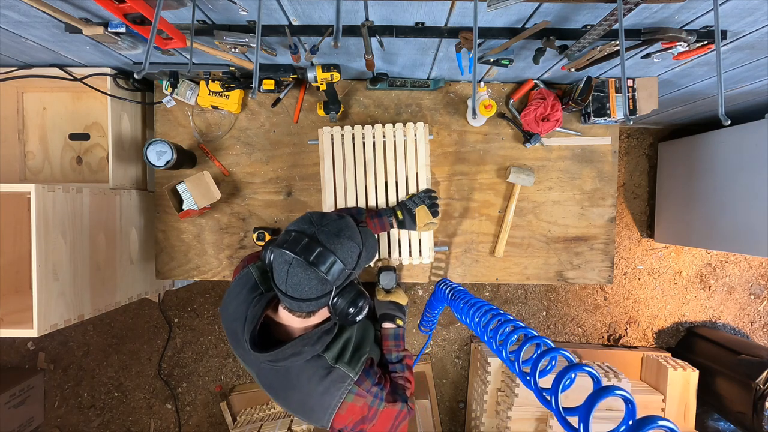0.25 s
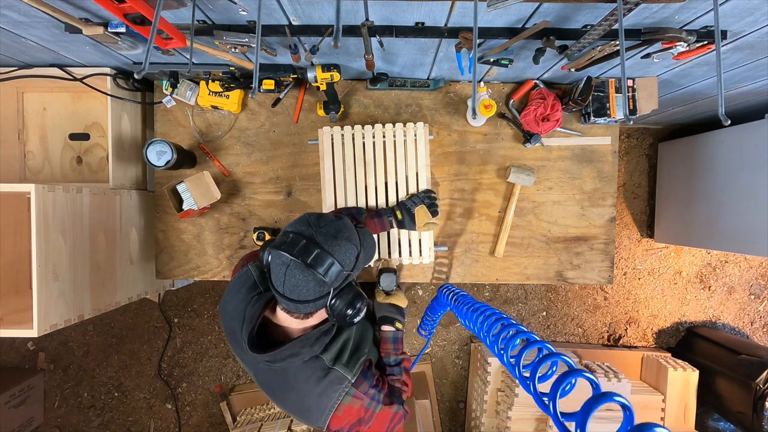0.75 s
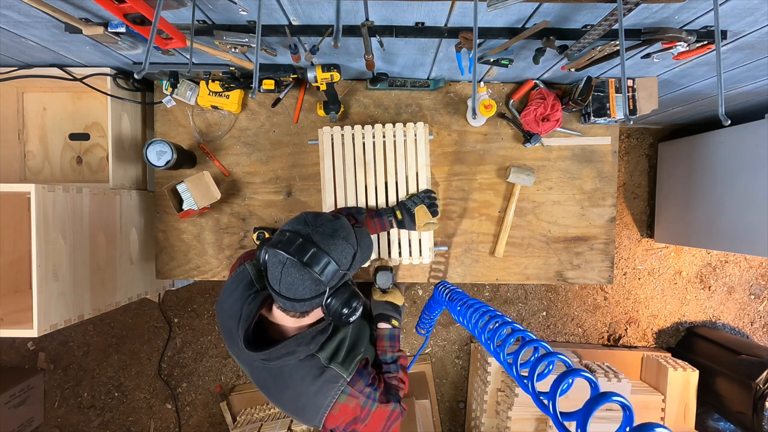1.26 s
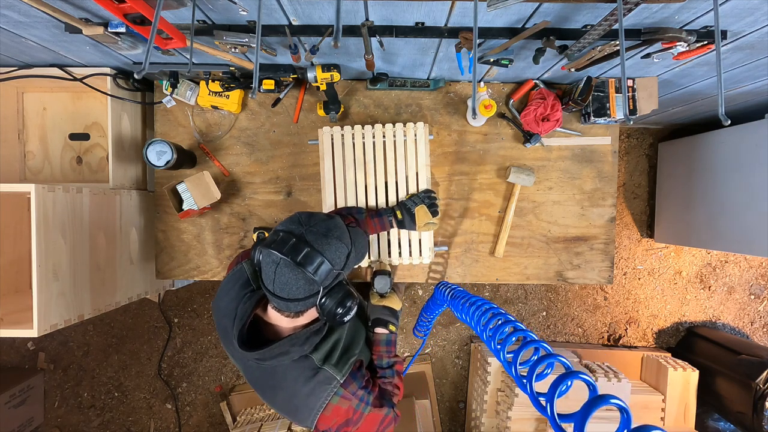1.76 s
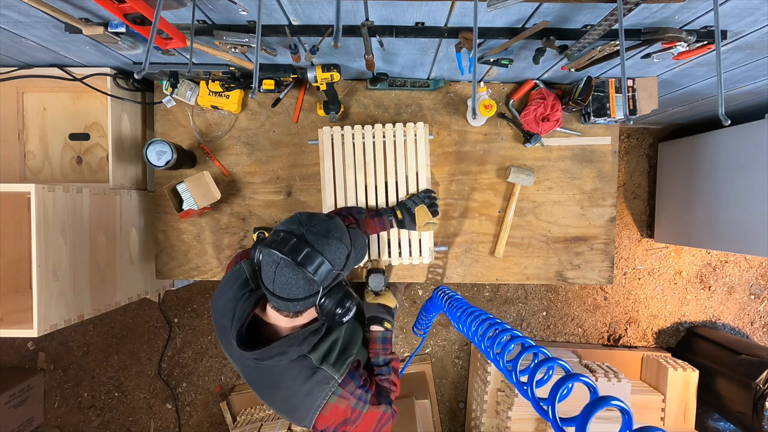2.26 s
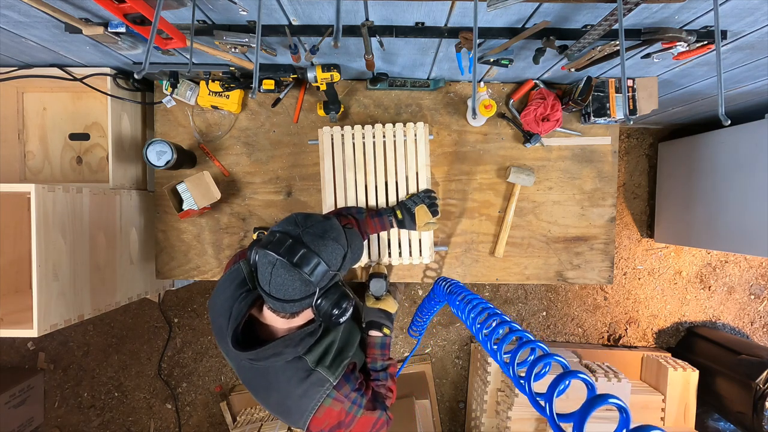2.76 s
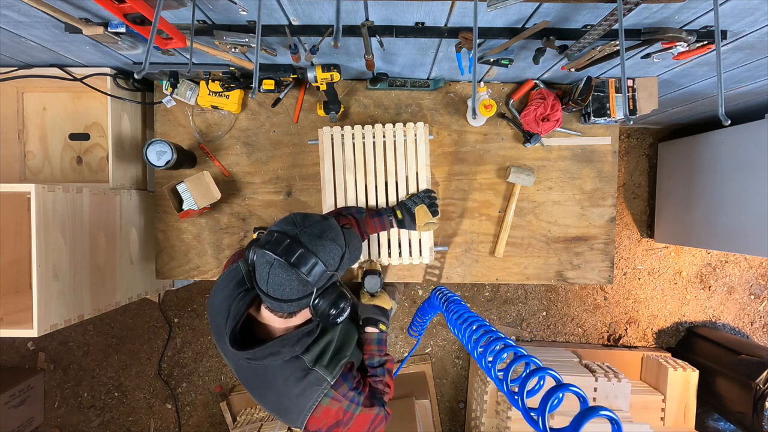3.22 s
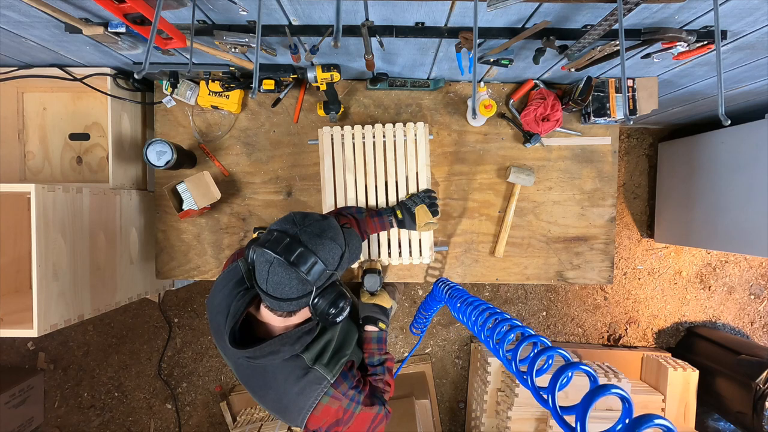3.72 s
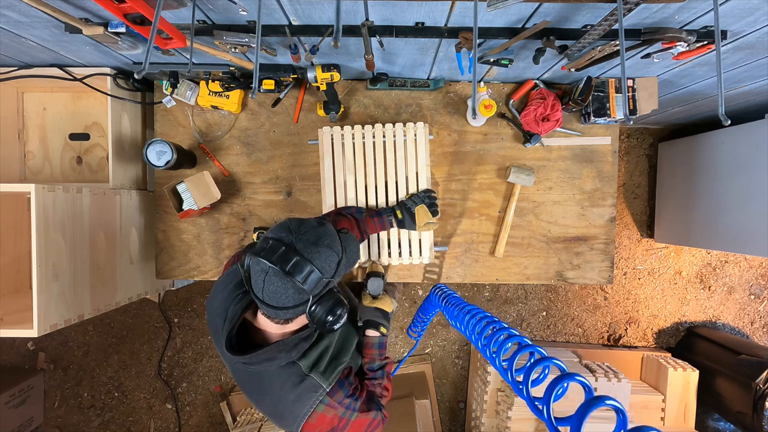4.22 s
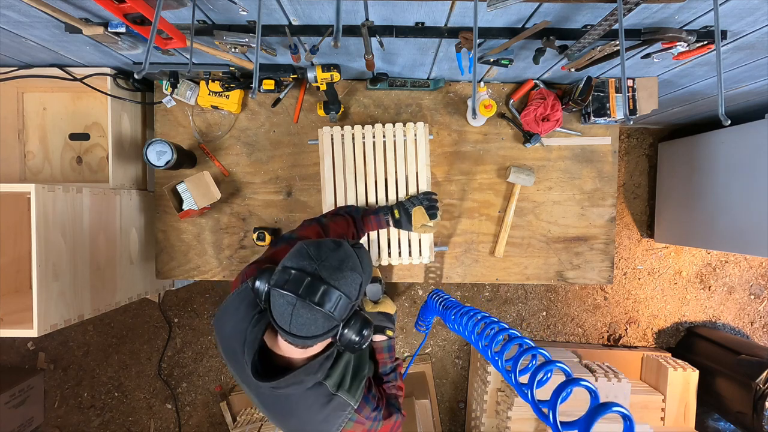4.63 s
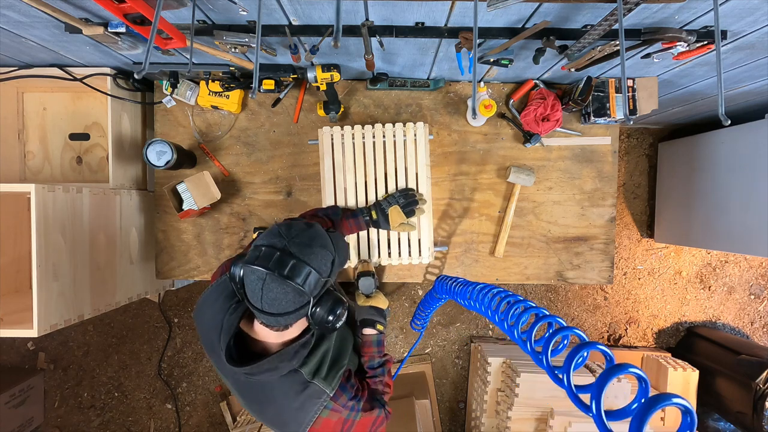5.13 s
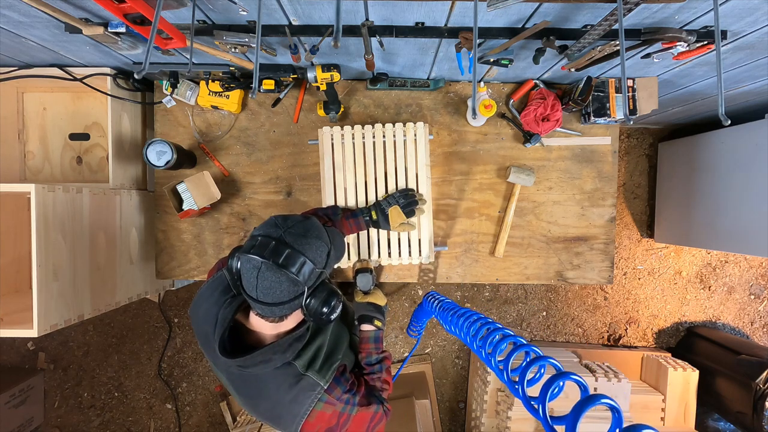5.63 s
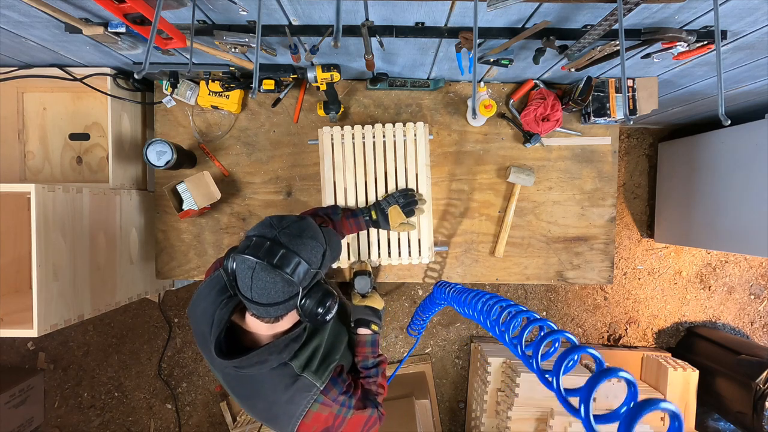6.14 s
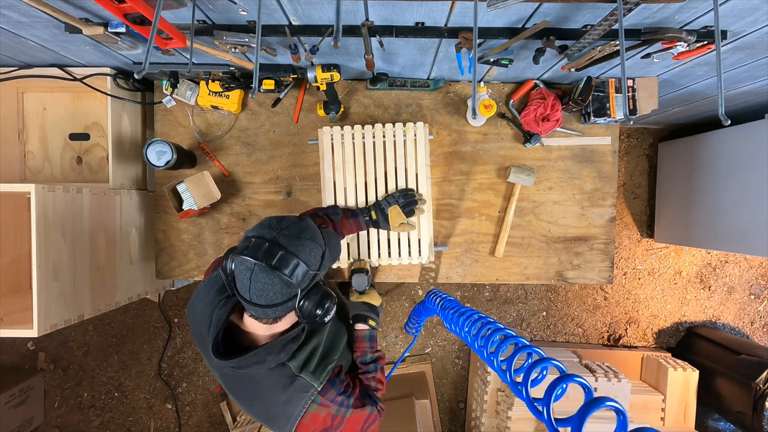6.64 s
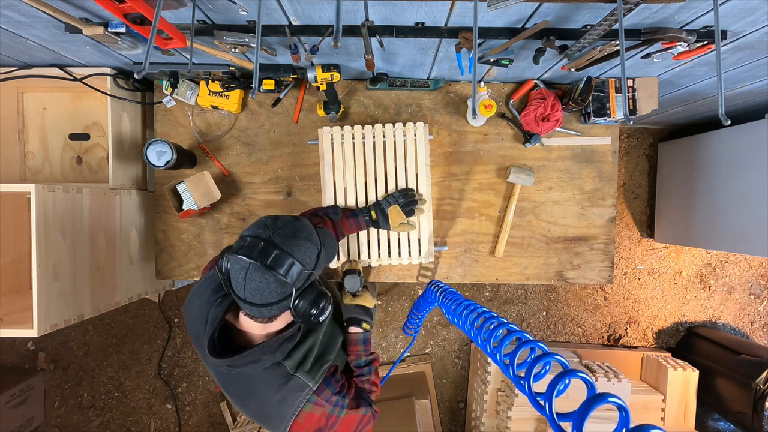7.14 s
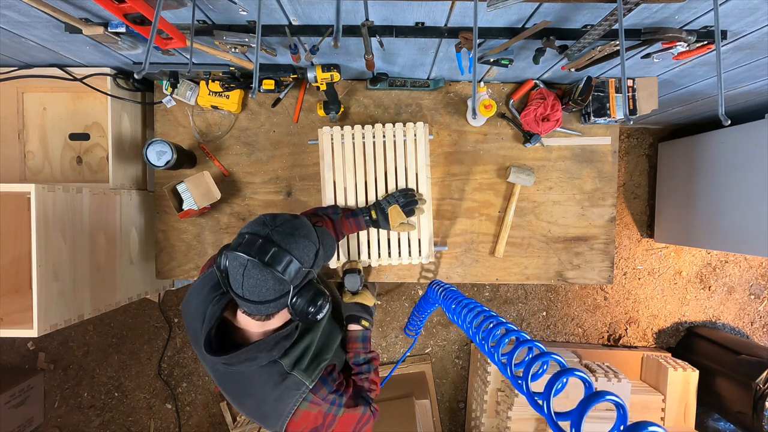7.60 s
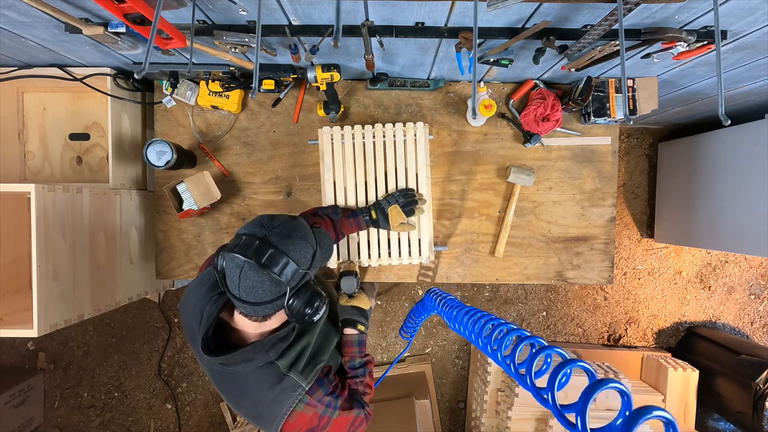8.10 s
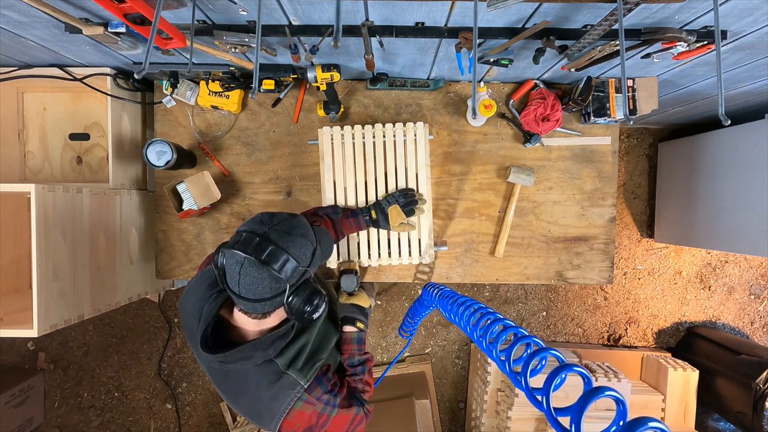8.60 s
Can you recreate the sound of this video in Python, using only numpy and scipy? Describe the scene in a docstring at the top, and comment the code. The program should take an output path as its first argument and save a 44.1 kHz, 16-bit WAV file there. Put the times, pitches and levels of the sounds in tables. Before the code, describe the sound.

In a small cluttered workshop, a pneumatic stapler drives eight separate staples into a slatted wooden frame, roughly one per second with longer gaps mid-way. Each is a hard crack with hollow wood thump, then a piston clack and a puff of air thinning to hiss. Soft wooden knocks, light ticks and cloth rustle fill the gaps, busiest around five seconds. Close microphone, peaks slightly overloaded, short room reflections.

```python
"""Rustling gloves and sleeves bring a pneumatic stapler down on a slatted wooden frame in a small workshop.
A faint woody noise swells just before each shot; the stroke is pressure pulses, cracks, wood modes and airy noise.
On release the piston clacks back, a noise puff thins to a hiss, and a faint steel sine rings on.
Between shots come soft knocks of ringing wood, light ticks and more rustle, most of it near five seconds.
The eighth stroke has only just begun at the end; room reflections and a dull noise floor lie under it all."""
import sys
import numpy as np
from scipy import signal
from scipy.fft import rfft, irfft, next_fast_len
from scipy.io import wavfile

SR = 44100
rng = np.random.default_rng(int(sys.argv[2]) if len(sys.argv) > 2 else 0)


def wav_out(sig):
    """Save sig, one row per channel (or a flat mono array), as 16-bit PCM at SR to the path in sys.argv[1]."""
    wavfile.write(sys.argv[1], SR, np.round(np.clip(np.atleast_2d(sig).T, -1, 1) * 32767).astype(np.int16))


N = 390726

SHOT_SIZE = SR * 3 // 4  # samples in one shot sound
AGE = np.arange(SHOT_SIZE) / SR  # seconds
LEAD_S = .01  # room ahead of the first impact in a shot sound


def from_db(db):
    """Turn decibels into an amplitude factor."""
    return 10 ** (np.asarray(db) / 20)


def fade(age, t60):
    """Silent before age zero, then falling 60 dB in t60 seconds."""
    return (age >= 0) * np.exp(-np.log(1000) * np.maximum(age, 0) / t60)


def swell(age, rise, t60):
    """A rounded rise into a decay, both in seconds."""
    return (1 - np.exp(-np.maximum(age, 0) / rise)) * fade(age, t60)


def noise(spectrum, size=SHOT_SIZE):
    """Noise of rms 1, coloured by a spectrum and rolled off beyond both its ends."""
    hz, db = np.transpose(spectrum)
    length = next_fast_len(size)
    bins = np.maximum(np.fft.rfftfreq(length, 1 / SR), 1)
    skirts = np.minimum(bins / hz[0], 1) ** 2 * np.minimum(hz[-1] / bins, 1) ** 2
    colour = from_db(np.interp(np.log(bins), np.log(hz), db))
    white = rfft(rng.standard_normal(length))
    x = irfft(white * skirts * colour, length)[:size]
    return x / x.std()


def uneven(spread_db, step_s):
    """A gain that glides to a new chance value every step."""
    t = np.arange(N) / SR
    chance = rng.standard_normal(N)
    return from_db(spread_db * np.interp(t / step_s, np.arange(N), chance))


def add(track, s, sound):
    """Mix a sound in at time s."""
    start = min(max(round(s * SR), 0), len(track))
    part = sound[:len(track) - start]
    track[start:start + len(part)] += part


# Shots: (trigger pulled [s], trigger released [s], stroke gain [dB], return gain [dB],
#         extra gain of inrushing air [dB], steel ring level [dB])
SHOTS = [(0.4276, 0.5787, 2, 2.5, 1, -59), (1.4724, 1.6219, 2, 2, 0.5, -58),
         (2.547, 2.6997, 1, 1.5, -1.5, -64), (4.0624, 4.2502, 1, 3, -2, -64.5),
         (5.7954, 5.947, 1.5, 2, 1, -60), (6.6612, 6.8065, 1, 1.5, 1.5, -57.5),
         (7.701, 7.8647, 1.2, 1, 0, -54), (8.844, 9.0, 0.5, 6.5, 2.5, -56)]
# Woody noise colour: (frequency [Hz], relative density [dB])
KNOCK_COLOUR = [(120, -18), (220, -5), (290, 9), (440, 0), (580, -0.5), (690, -13.5), (800, -6),
                (1000, -12), (1400, -21.5), (2000, -30.5), (5000, -50)]
STEEL_T60_S = 2.4


def stapler(swell_db=-31, swell_s=0.079, ring_hz=781):
    """A faint woody noise swells up to each shot, then stroke and return follow; a steel part rings on faintly."""
    out = np.zeros(N)
    ring_age = np.arange(2 * SR) / SR
    until_shot = AGE[:SR // 4][::-1]  # counts down, so the noise's decay runs backwards and grows
    for fire_s, release_s, stroke_db, return_db, air_db, ring_db in SHOTS:
        lead_in = noise(KNOCK_COLOUR, size=len(until_shot)) * swell(until_shot, 0.0016, swell_s)
        add(out, fire_s - until_shot[0], from_db(swell_db) * lead_in)
        add(out, fire_s - LEAD_S, from_db(stroke_db) * stroke(air_db))
        add(out, release_s - LEAD_S, from_db(return_db) * release())
        ring = np.sin(2 * np.pi * ring_hz * ring_age) * fade(ring_age, STEEL_T60_S)
        add(out, release_s, from_db(ring_db) * ring)
    return out


# Impacts of the stroke (valve, driver on staple, staple seating, recoil), before the shot's gain:
# (delay [s], mean push level [dB], push frequency [Hz], crack level [dB])
STROKE = [(.0007, 3.5, 493.4, -14), (.0075, 1.5, 419.4, -10.5), (.0112, -1.5, 1141, -10.5),
          (.0122, -5, 380, -13), (.0152, -6, 260, -14.5), (.0218, -7, 300, -18.5)]
# Colours of the stroke's crack, inrushing air, sizzle and bench thud: (frequency [Hz], relative density [dB])
STROKE_CRACK = [(500, -4), (1000, 9.5), (1800, -1.5), (2400, -8.5), (3500, -13), (5000, -22), (7500, -28.5),
                (11000, -37), (16000, -43)]
AIR_IN = [(40, -24.5), (100, -17.5), (200, -6), (340, 5.5), (600, 0), (800, -10), (950, -17), (1300, -9.5),
          (1800, -20.5), (2400, -30), (4200, -43), (5500, -57.5), (9000, -65), (16000, -73)]
HISS = [(2500, -15), (4200, 1.5), (5100, -8), (5700, -2), (6400, -7.5), (7200, 0.5), (8800, -4),
        (10200, -13), (16000, -19.5)]
THUD = [(25, -11), (70, 2), (140, -2), (250, -19), (800, -53)]


def stroke(air_db, wood_db=0, bounce_db=-10, bounce_s=.066, bounce_gap_s=.017, bounce_loss_db=3,
           rush_db=-24, air_hold_s=.09, air_t60=0.39, sizzle_db=-46, bench_db=-35):
    """The staple is driven home and the frame bounces twice; air rushes into the cylinder, holds, then fades."""
    age = AGE - LEAD_S
    wood = from_db(wood_db) * frame(age - .0105, damping=1.0)
    for k in range(2):
        since = age - bounce_s - k * bounce_gap_s
        bounce = frame(since, damping=1.2) * swell(since, 0.0012, 2)
        wood = wood + from_db(bounce_db - k * bounce_loss_db) * bounce
    rush_shape = np.clip((age + .006) / .025, 0, 1) * fade(np.maximum(age - air_hold_s, 0), air_t60)
    rush = from_db(rush_db + air_db) * noise(AIR_IN) * rush_shape
    sizzle = from_db(sizzle_db) * noise(HISS) * swell(age - .008, 0.0025, 0.052)
    bench = from_db(bench_db) * noise(THUD) * swell(age, 0.0036, 0.12)
    return impacts(STROKE, STROKE_CRACK, 0.022) + wood + rush + sizzle + bench


# Impacts of the returning piston and valve, before the shot's return gain:
# (delay [s], mean push level [dB], push frequency [Hz], crack level [dB])
RETURN = [(.0006, -2, 622, -9), (.0024, -9.5, 1101, -18.5), (.0056, -2.5, 438.3, -20.5),
          (.017, -5, 400, -29), (.0502, -8.5, 850, -24.5), (.052, -6.5, 430, -20.5)]
# Colours of the return's crack and the vented puff: (frequency [Hz], relative density [dB])
RETURN_CRACK = [(500, -7.5), (1000, 1), (1900, 4), (3100, -3), (4400, -30.5), (6000, -24), (9000, -35),
                (16000, -43.5)]
AIR_OUT = [(40, -18), (90, 6.5), (170, -1), (330, -8), (1000, 4), (1500, -5), (2200, -13.5), (2700, -22.5),
           (4200, -23), (5000, -29.5), (9000, -42), (16000, -51.5)]


def release(wood_db=-13, puff_db=-16, puff_t60=0.19, hiss_db=-51, hiss_t60=.42):
    """The piston clacks back; the vented air starts as a puff and thins to a hiss."""
    age = AGE - LEAD_S
    wood = from_db(wood_db) * frame(age - .005, damping=0.97)
    puff = from_db(puff_db) * noise(AIR_OUT) * swell(age, .003, puff_t60)
    hiss = from_db(hiss_db) * noise(HISS) * swell(age, 0.0067, hiss_t60)
    return impacts(RETURN, RETURN_CRACK, 0.01) + wood + puff + hiss


def impacts(table, crack_colour, crack_t60):
    """Each impact shoves the air and gives a short bright crack."""
    out = 0
    for delay, push_db, hz, crack_db in table:
        age = AGE - LEAD_S - delay
        out = out + from_db(push_db + rng.normal(0, 0.18)) * push(age, hz)
        crack = noise(crack_colour) * swell(age + .0007, 0.00028, crack_t60)  # starts 0.7 ms early
        out = out + from_db(crack_db) * crack
    return out


def push(age, hz, cycles=0.47):
    """A short pressure swing of about one cycle, centred on age zero and strongest around hz."""
    turns = hz * age
    return -np.sin(2 * np.pi * turns) * np.exp(-(turns / cycles) ** 2)


# Modes of frame and bench, before chance, striking spot and damping:
# (frequency [Hz], level [dB], time to fall 60 dB [s])
FRAME = [(82, -33.5, 0.37), (134.1, -30, 0.63), (200, -25.5, 0.068), (275.4, -15, 0.17), (301.4, -23, 0.39),
         (334.1, -23, 0.37), (394, -22.5, 0.32), (419.6, -20.5, .22), (500, -30.5, 0.42),
         (586, -16.5, 0.08), (650, -29, 0.14), (805, -32.5, 0.097), (1006, -32.5, 0.23), (1437, -36, 0.11),
         (1670, -37.5, 0.091)]


def frame(age, damping, favoured_hz=400, reach_octaves=9):
    """The frame rings in its modes, a little differently at every blow; the spot struck favours some of them."""
    out = 0
    for hz, db, t60 in FRAME:
        share = 1 / (1 + (np.log2(hz / favoured_hz) / reach_octaves) ** 2)
        level = share * from_db(db + rng.uniform(-1.9, 2.3))
        out = out + level * np.sin(2 * np.pi * hz * age) * fade(age, t60 / damping)
    return out


# Soft knocks of tool and frame, levels before the trims of knocks():
# (time [s], peak level [dB], favoured frequency [Hz], bass level [dB], click level [dB])
KNOCKS = [(0.956, -43, 346, -67, -58), (1.038, -41.5, 292, -65, -59), (1.235, -41.5, 274, -51, -69.5),
          (1.985, -46.5, 259, -65, -62), (2.122, -39.5, 352, -56, -56.5), (3.052, -45.5, 288, -47, -62),
          (3.102, -38, 285.4, -66, -53), (3.414, -40.5, 345, -63, -57.5), (3.46, -46, 338.4, -50, -68.5),
          (3.625, -48, 363, -59, -76), (3.781, -38.5, 267, -40.5, -60), (4.978, -30.5, 264, -38.5, -56),
          (5.032, -36, 480, -45, -49), (5.102, -30, 332, -48, -44.5), (5.135, -39, 420, -52, -60),
          (5.17, -32.5, 310, -48.5, -60), (6.361, -42, 252, -56, -54), (6.473, -45, 272, -53, -69.5),
          (7.268, -32, 324, -54.5, -54.5), (7.455, -41.5, 266.6, -44.5, -65.5),
          (8.268, -35.5, 298, -51, -52)]
# Light ticks of metal and hose, before the tick trim: (time [s], level [dB])
TICKS = [(1.9635, -61), (3.075, -57), (3.6126, -55), (3.7182, -61), (3.9915, -55), (4.8226, -52.5),
         (5.0163, -44)]
# Colours of click and tick: (frequency [Hz], relative density [dB])
CLICK_COLOUR = [(400, -6.5), (800, 8.5), (1100, 3), (1400, 6), (1800, -11), (2400, -11.5), (3500, -15.5),
                (6000, -30), (14000, -52)]
TICK_COLOUR = [(600, -5.5), (2000, 9.5), (6000, -3.5), (12000, -5), (16000, -30)]


def knocks(wood_db=-2, scuff_db=-10, bass_db=0, click_db=4, tick_db=-5):
    """Padded contacts: a click, a scuff, the hand-damped frame and a thud of the bench; and a few light ticks."""
    out = np.zeros(N)
    for s, peak_db, hz, thud_db, edge_db in KNOCKS:
        wood = frame(AGE, damping=2.2, favoured_hz=hz, reach_octaves=0.38) * swell(AGE, .005, 1)
        body = from_db(peak_db + wood_db) * wood / np.abs(wood).max()
        scuff = from_db(peak_db + scuff_db) * noise(KNOCK_COLOUR) * swell(AGE, 0.0016, 0.21)
        thud = from_db(thud_db + bass_db) * noise(THUD) * swell(AGE, 0.0023, 0.19)
        click = from_db(edge_db + click_db) * noise(CLICK_COLOUR) * swell(AGE, 0.002, 0.055)
        add(out, s, body + scuff + thud + click)
    for s, peak_db in TICKS:
        tick = noise(TICK_COLOUR) * swell(AGE, .0002, 0.031)
        add(out, s, from_db(peak_db + tick_db) * tick)
    return out


# Arm movement as rustle, before its sway: slight, then one long reach to a new grip, at last nearly still:
# (time [s], level [dB])
ARM = [(0, -63), (4.38, -63.5), (4.55, -53), (5.13, -52.5), (5.45, -62.5), (7.2, -68), (8.35, -76.5),
       (8.86, -70.5)]
# Colours of dull rustle and bright swish: (frequency [Hz], relative density [dB])
RUSTLE = [(50, -4), (100, 1.5), (350, -3), (550, -7.5), (700, -10), (1250, -16.5), (2000, -26.5),
          (3500, -39)]
SWISH = [(600, 0), (1300, 1.5), (2000, 1), (4000, -5), (8000, -11.5), (16000, -19.5)]
AIM_DB, AIM_RISE_S = -55.5, 0.56  # tool brought down for a shot; time to grow by 60 dB
LIFT_DB, LIFT_AFTER_S, LIFT_WIDTH_S = -60, .32, .13  # tool lifted off, timed from the trigger's release


def handling(swish_db=-17, aim_swish_db=-13, lift_swish_db=-25, grain_db=1.5, sway_db=2.0):
    """Cloth and leather rub in small uneven catches as the arm moves, aims the tool and lifts it off again."""
    t = np.arange(N) / SR
    arm = from_db(np.interp(t, *np.transpose(ARM))) * uneven(sway_db, 0.052)
    aim = 0
    lift = 0
    for fire_s, release_s, *_ in SHOTS:
        aim = aim + from_db(AIM_DB) * fade(fire_s - t, AIM_RISE_S)  # grows until the shot
        from_peak = (t - release_s - LIFT_AFTER_S) / LIFT_WIDTH_S
        lift = lift + from_db(LIFT_DB) * np.exp(-from_peak ** 2)
    body = np.linalg.norm([arm, aim, lift], axis=0)  # levels add as powers
    bright = [from_db(swish_db) * arm, from_db(aim_swish_db) * aim, from_db(lift_swish_db) * lift]
    swish = np.linalg.norm(bright, axis=0)
    cloth = body * noise(RUSTLE, size=N) + swish * noise(SWISH, size=N)
    return uneven(grain_db, .008) * cloth


# Colour of the reflections: (frequency [Hz], relative density [dB])
WALLS = [(40, 0), (100, 0.5), (400, -5.5), (1000, -3.5), (2000, -2.5), (5000, -3.5), (16000, -1)]


def workshop(x, wet_db=-20, t60=0.37):
    """Diffuse reflections from the walls of a cluttered room, as a decaying noise tail of unit energy."""
    tail = noise(WALLS) * swell(AGE - .012, 0.0033, t60)
    tail = tail / np.sqrt(np.sum(tail ** 2))
    return from_db(wet_db) * signal.fftconvolve(x, tail)[:N]


# Colour of the background: (frequency [Hz], relative density [dB])
FLOOR = [(20, 1), (60, 7), (125, 1), (290, -3.5), (470, -8.5), (750, -16.5), (1000, -18), (2000, -27.5),
         (4000, -35), (8000, -36.5), (16000, -47.5)]


def still_air(floor_db=-65.5, rumble_db=-71, lumpy_db=4.5):
    """A steady dull noise floor with an uneven low rumble."""
    floor = from_db(floor_db) * noise(FLOOR, size=N)
    rumble = from_db(rumble_db) * uneven(lumpy_db, 0.066) * noise(THUD, size=N)
    return floor + rumble


def scene():
    """Stapler and knocks in the room, over rustle and still air."""
    work = stapler() + knocks()
    return (work + workshop(work) + handling() + still_air())[None]


def record(dry):
    """The loudest pulses overload the microphone and are rounded off; deep bass and top are cut."""
    clipped = dry / (1 + dry ** 8) ** (1 / 8)
    bass_cut = signal.butter(1, 45, "high", fs=SR, output="sos")
    top_cut = signal.ellip(10, .1, 70, 15900, fs=SR, output="sos")  # steep, above 15.9 kHz
    return signal.sosfilt(top_cut, signal.sosfilt(bass_cut, clipped))


dry = scene()
out = record(dry)
wav_out(out)
```